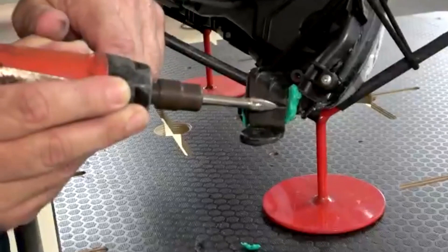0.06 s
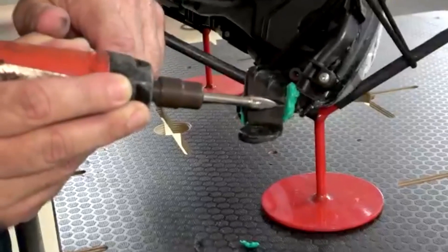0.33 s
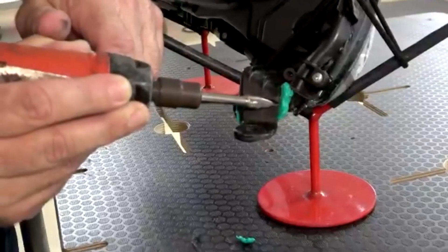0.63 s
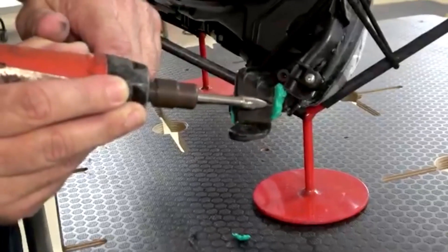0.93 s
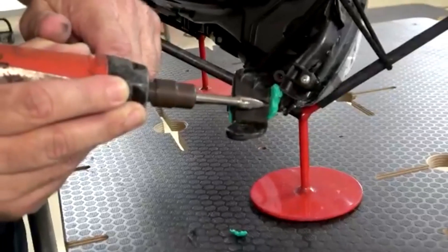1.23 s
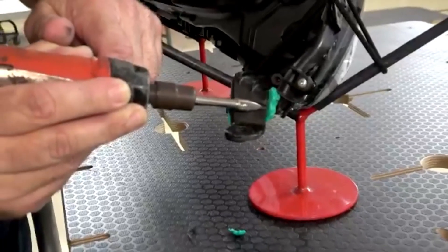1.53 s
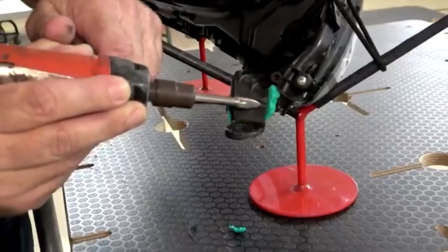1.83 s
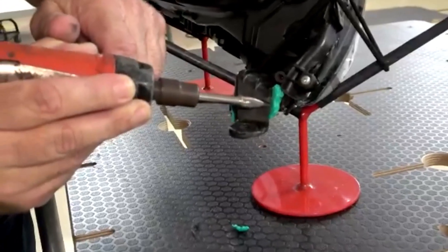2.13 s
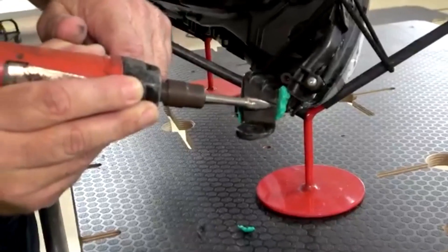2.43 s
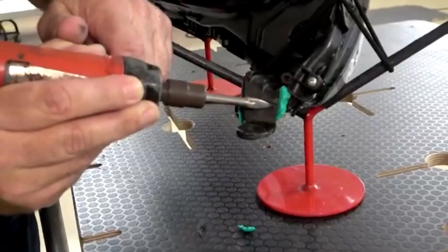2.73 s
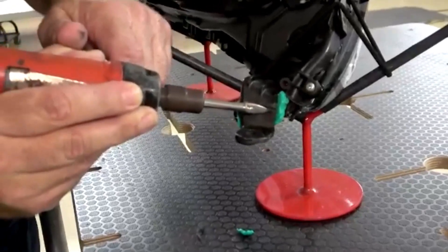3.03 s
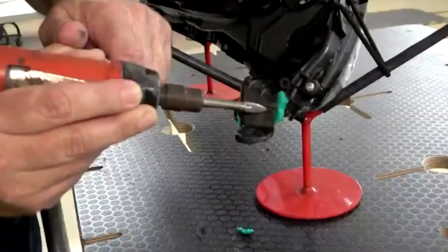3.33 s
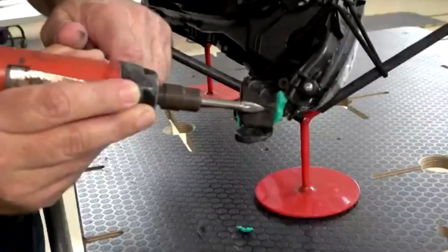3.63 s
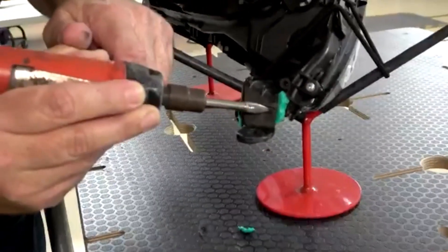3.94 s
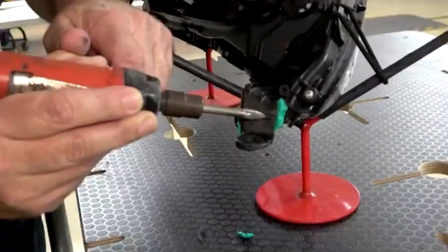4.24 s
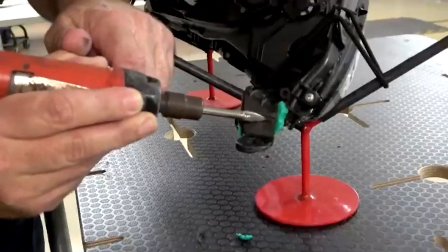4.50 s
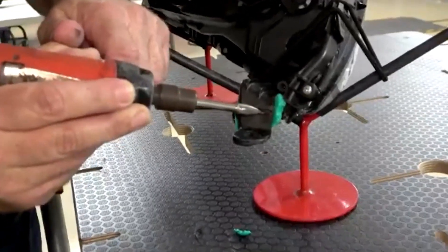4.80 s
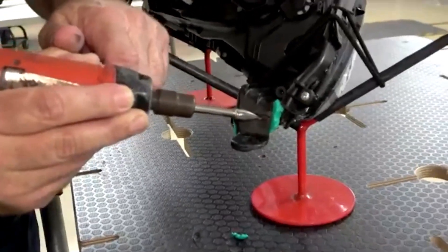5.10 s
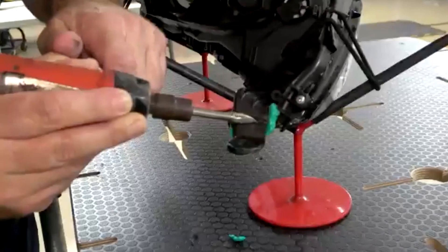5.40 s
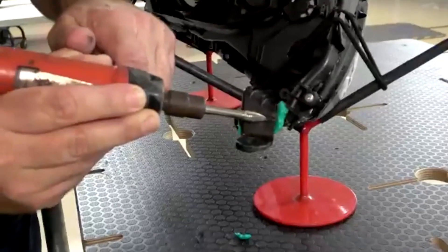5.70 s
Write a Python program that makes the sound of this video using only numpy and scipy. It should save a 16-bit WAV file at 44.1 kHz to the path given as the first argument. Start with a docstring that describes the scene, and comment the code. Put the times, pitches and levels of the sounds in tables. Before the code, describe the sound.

Steady rushing air and a high, wavering whine come from a small rotary grinder biting into plastic in a workshop.

```python
"""Air grinder cutting plastic

An air-driven die grinder cuts a groove in a plastic part, close by on a workbench. Exhaust air hisses
throughout and the four-vane rotor whines. Hand pressure slows the shaft a little and makes the bearing
sing and the burr (the cutting tip) rasp. The plastic hums on the first multiples of the shaft speed as
the burr bites. A small workshop adds a short echo to the hiss, the rasp and two brief squeals."""
import sys
import numpy as np
from scipy import signal
from scipy.fft import rfft, irfft
from scipy.io import wavfile
from scipy.ndimage import uniform_filter1d

SR = 44100
rng = np.random.default_rng(int(sys.argv[2]) if len(sys.argv) > 2 else 0)


def generate_wav(sig):
    """Save sig (samples, or channels by samples) to the path in sys.argv[1] as 16-bit PCM at SR."""
    pcm = np.round(np.clip(np.atleast_2d(sig).T, -1, 1) * 32767).astype(np.int16)
    wavfile.write(sys.argv[1], SR, pcm)


N = 254016
T = np.arange(N) / SR

# how hard the hand pushes, 0 dB being a full push: t/s, level/dB
HAND_PRESSURE = [(0.0, -18.5), (0.73, -12.0), (0.88, -5.5), (1.27, -3.5), (2.33, -4.5), (2.6, -0.5),
                 (3.48, -1.0), (3.7, -18.0), (3.92, -9), (4.75, -11.5), (5.18, -19.0), (5.76, -8.5)]
# how firmly the burr bites, 0 dB being a full bite: t/s, level/dB
BITE_DEPTH = [(0.0, -40), (0.95, -22.5), (1.38, -8.5), (1.9, -10.5), (2.28, -7), (2.6, -11), (3.2, -9),
              (3.4, -4.5), (3.75, -8), (4.05, -8), (4.3, -1.5), (4.76, -4.5), (4.9, -0.5), (5.35, -1.0),
              (5.52, -14.5), (5.76, -11.5)]
# tone colour of the exhaust hiss: f/Hz, relative level/dB
HISS_COLOUR = [(30, -32), (60, -22.5), (110, -26), (190, -24.5), (235, -13), (400, -12.5), (700, -8),
               (1200, -4.5), (1900, -0.33), (3300, 0), (6200, -1.2), (8500, 0.5), (11000, -1),
               (13500, -3.5), (15800, -5)]
# whistles of the exhaust slots: f/Hz, width/Hz, relative level/dB
SLOT_WHISTLES = [(7470, 53, -66), (7670, 35, -74), (7850, 60, -67), (7980, 55, -66.5), (10380, 140, -68)]
# the bearing's ball-pass tone and side tones whole turns apart: shaft multiple, relative level/dB
BEARING_TONES = [(2.58, -72.5), (3.58, -67.5), (4.58, -71.5), (5.58, -76), (8.57, -77), (11.5, -76)]
# tones in the rotor's whine: shaft multiple, relative level/dB
WHINE_TONES = [(6, -69), (7, -67.5), (8, -71.5), (9, -75), (10, -68), (12, -66.5), (16, -78), (18, -69.5),
               (20, -82), (24, -68.5), (28, -72.5), (32, -74), (36, -66.5), (38, -74), (40, -75), (44, -79),
               (48, -77), (52, -73)]
# the vane tone swells and fades as the tool is moved: t/s, level/dB
VANE_LEVEL = [(0.0, -56.0), (0.18, -62.5), (0.3, -57.5), (0.78, -56), (1.02, -52), (1.25, -60),
              (1.8, -59.5), (1.9, -71), (2.15, -63), (2.24, -57.5), (2.46, -67), (2.72, -58.5),
              (3.12, -56.5), (3.22, -64.5), (3.4, -53.5), (3.54, -61.5), (3.76, -53.5), (4.02, -53),
              (4.36, -67), (4.77, -52), (5.02, -67), (5.33, -66.0), (5.45, -62), (5.76, -59.5)]
# squeals of the burr: t/s, f/Hz before detuning, length/s, level/dB
BURR_SQUEALS = [(.36, 7800, 0.022, -51), (.6, 7950, .06, -55)]
# tone colour of the tearing chips: f/Hz, relative level/dB
CHIP_COLOUR = [(80, -30), (250, -10.5), (600, -14), (1500, 1), (2700, 0), (5000, -7), (14000, -13)]
# hum of the plastic: shaft multiple, level/dB at full push and bite, dB per dB of push, dB per dB of bite
HUM_TONES = [(1, -60, 0.07, 0.41), (2, -56, 1, 0), (3, -49, 0, 1)]
# faint overtone at five times the shaft speed: t/s, level/dB
OVERTONE_LEVEL = [(0.0, -71), (0.78, -66), (0.98, -58.0), (1.26, -73), (1.68, -66), (1.85, -74), (4.8, -70),
                  (5.22, -57), (5.5, -75.5), (5.76, -62.5)]


def undb(db):
    """Turn decibels into a gain."""
    return 10 ** (np.asarray(db) / 20)


def unit(x):
    """Scale a signal to an average (rms) level of 1."""
    return x / np.sqrt(np.mean(x ** 2))


def curve(table):
    """Join a table's points in time with straight lines."""
    return np.interp(T, *np.transpose(table))


def wander(rate):
    """A smooth random wiggle of rms 1 that changes about rate times a second."""
    hold = max(int(SR / rate), 2)
    steps = rng.standard_normal(4096)[np.arange(N) // hold]
    return unit(uniform_filter1d(uniform_filter1d(steps, hold), hold))


def colour(x, points):
    """Shape a sound's lows and highs by a colour table; rms 1."""
    hz, db = np.transpose(points)
    f = np.maximum(np.fft.rfftfreq(N, 1 / SR), 1)
    gain = undb(np.interp(np.log(f), np.log(hz), db))
    return unit(irfft(rfft(x) * gain, N))


def ring(hz, width_hz):
    """Noise that rings around one pitch; rms 1."""
    f = np.fft.rfftfreq(N, 1 / SR)
    return unit(irfft(rfft(rng.standard_normal(N)) / (1 + 2j * (f - hz) / width_hz), N))


def tone(turns, multiple):
    """A sine wave that swings multiple times per turn; rms 1."""
    return np.sqrt(2) * np.sin(2 * np.pi * (multiple * turns + rng.random()))


def workshop(x, echo_db=-9, fade_s=0.18):
    """Bench and walls add a short wash of echo that falls 60 dB in fade_s."""
    t = T[:SR // 2]
    tail = rng.standard_normal(len(t)) * np.exp(-np.log(1000) * t / fade_s)
    return x + undb(echo_db) * signal.fftconvolve(x, tail / np.linalg.norm(tail))[:N]


def exhaust(hiss_db=-44.5, flutter_db=0.42, whistle_gain_db=1.5):
    """A steady jet of air hisses, flutters slightly and whistles in the slots it leaves by."""
    jet = colour(rng.standard_normal(N), HISS_COLOUR)
    whistles = sum(undb(db + 1.7 * wander(6)) * ring(hz, width) for hz, width, db in SLOT_WHISTLES)
    return jet * undb(hiss_db + flutter_db * wander(50)) + undb(whistle_gain_db) * whistles


def shaft_turns(push_db, free_hz=286.06, slowdown_hz=1.4, wobble_hz=0.25):
    """Count the shaft's turns so far: pushing slows it and the cut makes its speed tremble."""
    speed_hz = free_hz - slowdown_hz * undb(push_db) ** 2 + wobble_hz * wander(40)
    return np.cumsum(speed_hz) / SR


def bearing(turns, friction_db, gain_db=-1.0, flicker_db=1.6):
    """The rolling balls sing louder as the shaft is pushed sideways."""
    balls = sum(tone(turns, multiple) * undb(db + flicker_db * wander(12))
                for multiple, db in BEARING_TONES)
    return undb(gain_db + friction_db) * balls


def rotor_whine(turns, gain_db=-2.0, flicker_db=3.0):
    """The vanes chop the air into a high, wavering whine."""
    whine = sum(tone(turns, multiple) * undb(db + flicker_db * wander(14))
                for multiple, db in WHINE_TONES)
    return undb(gain_db) * whine


def vane_tone(turns, vanes=4, flutter_db=1.56):
    """Each vane passes the exhaust port once a turn, and together they make one tone."""
    return tone(turns, vanes) * undb(curve(VANE_LEVEL) + flutter_db * wander(16))


def burr_squeals(waver_hz=40, detune=0.99):
    """The burr catches and rings for an instant."""
    drift = np.cumsum(waver_hz * wander(200)) / SR
    squeals = np.zeros(N)
    for peak_s, hz, length_s, db in BURR_SQUEALS:
        swell = np.exp(-(2 * (T - peak_s) / length_s) ** 2)
        squeals += undb(db) * swell * tone(hz * T + drift, detune)
    return squeals


def burr_rasp(turns, friction_db, rasp_db=-60, uneven_db=3.5):
    """Chips tear off in a burst on each turn, no two bursts alike."""
    bursts = (1 + np.cos(2 * np.pi * turns)) * undb(uneven_db * wander(150))
    chips = colour(bursts * rng.standard_normal(N), CHIP_COLOUR)
    return chips * undb(rasp_db + friction_db)


def plastic_hum(turns, push_db, flutter_db=0.96, overtone_flutter_db=2.5):
    """The burr nudges the plastic once a turn: pushing lifts the second tone, biting the first and third."""
    bite_db = curve(BITE_DEPTH)
    hum = np.zeros(N)
    for multiple, full_db, per_push, per_bite in HUM_TONES:
        level_db = full_db + per_push * push_db + per_bite * bite_db
        hum += tone(turns, multiple) * undb(level_db + flutter_db * wander(25.01))
    overtone = tone(turns, 5) * undb(curve(OVERTONE_LEVEL) + overtone_flutter_db * wander(14))
    return hum + overtone


def scene(friction_per_push=0.33):
    """Mix the sounds; the tool is straight ahead, so left and right are the same."""
    push_db = curve(HAND_PRESSURE)
    friction_db = friction_per_push * push_db  # in the cut and the bearing
    turns = shaft_turns(push_db)
    air_and_chips = workshop(exhaust() + burr_rasp(turns, friction_db) + burr_squeals())
    tones = plastic_hum(turns, push_db) + vane_tone(turns)
    tones += rotor_whine(turns) + bearing(turns, friction_db)
    return np.tile(air_and_chips + tones, (2, 1))


def record(dry, top_hz=15750):
    """A steep filter cuts off the highest treble."""
    return signal.sosfilt(signal.ellip(12, 0.1, 70, top_hz, fs=SR, output="sos"), dry)


dry = scene()
out = record(dry)
generate_wav(out)
```